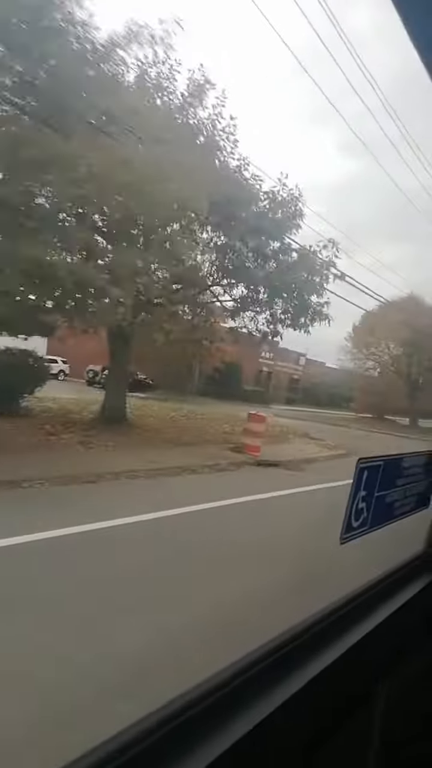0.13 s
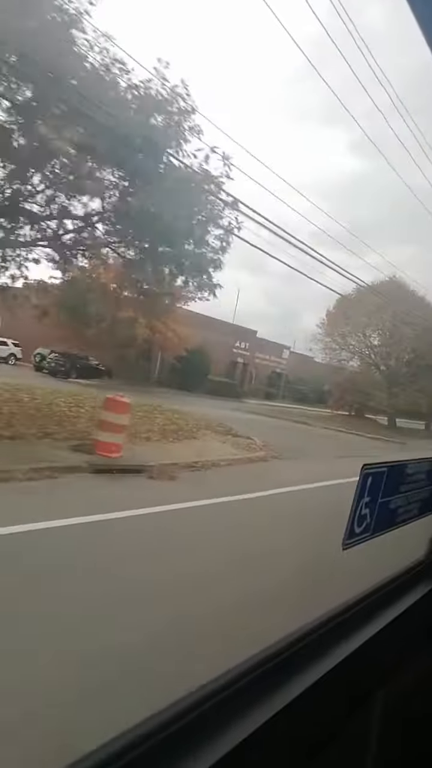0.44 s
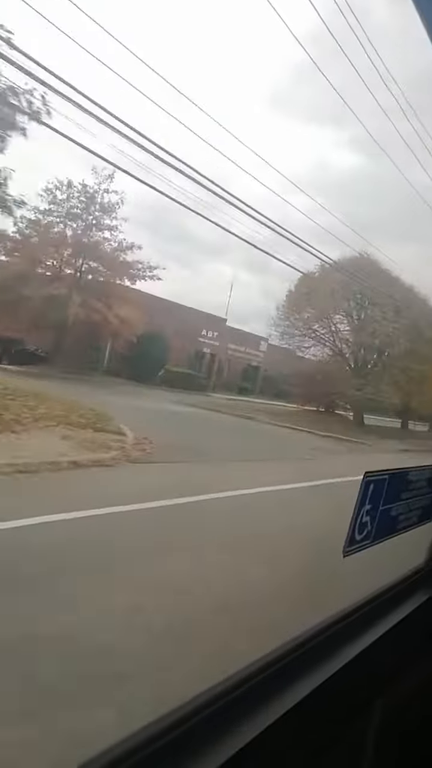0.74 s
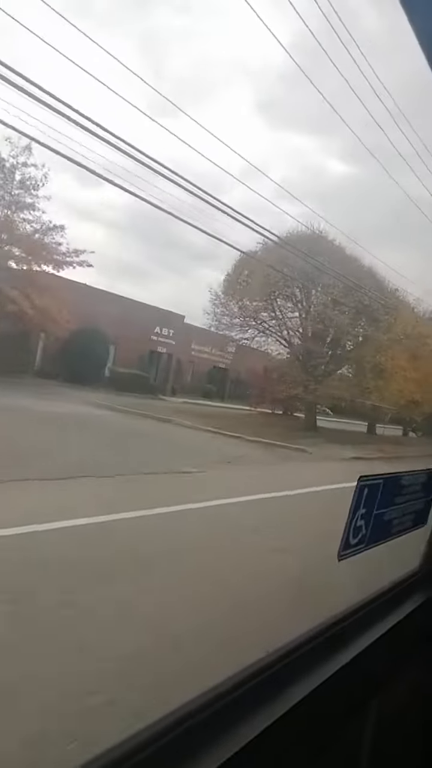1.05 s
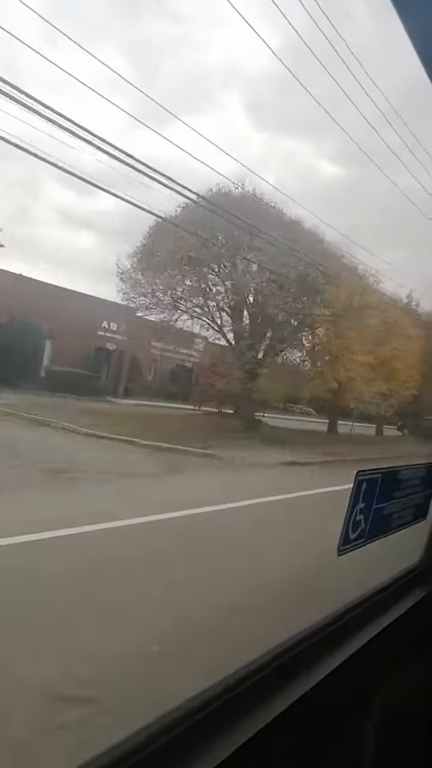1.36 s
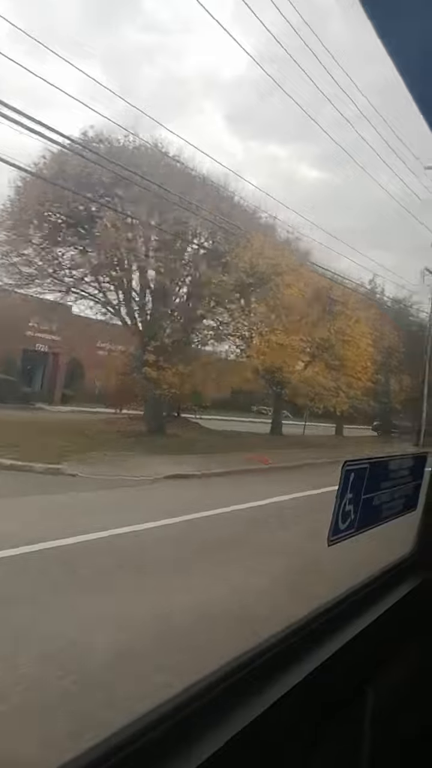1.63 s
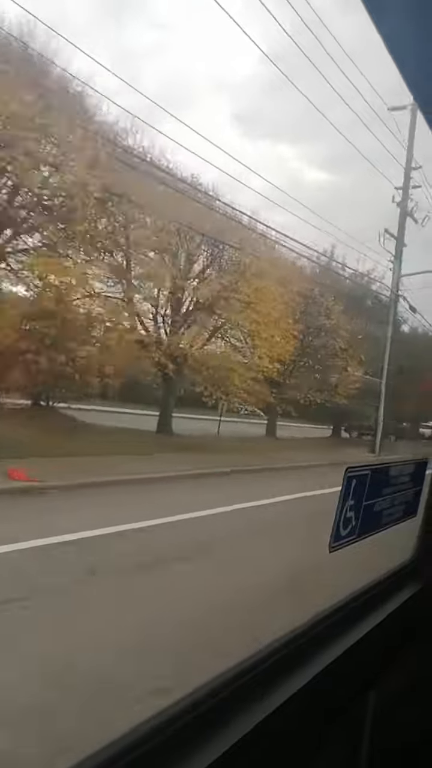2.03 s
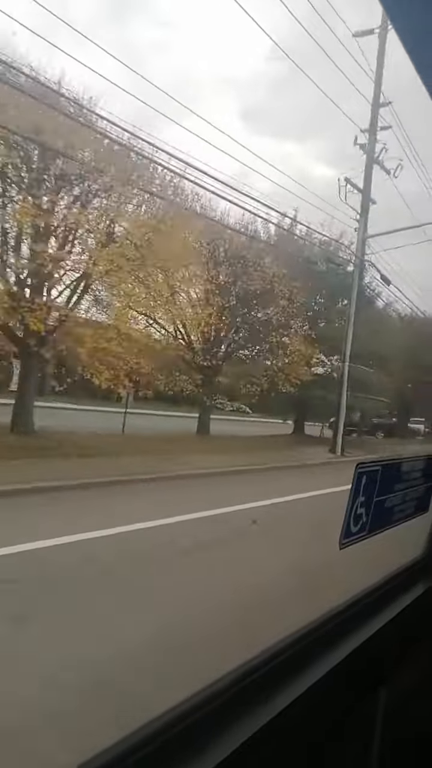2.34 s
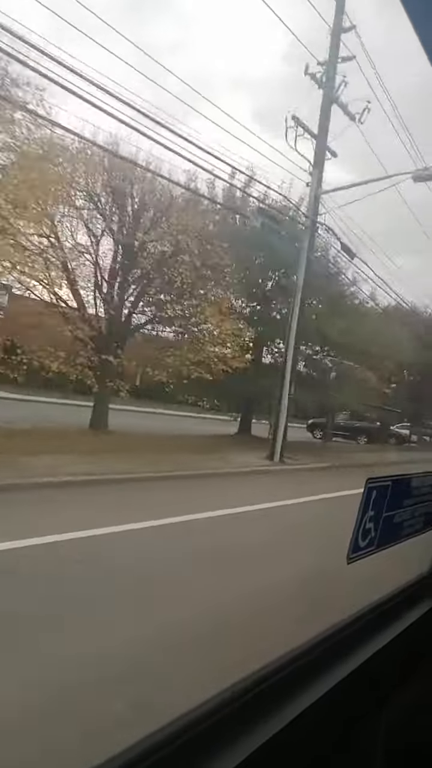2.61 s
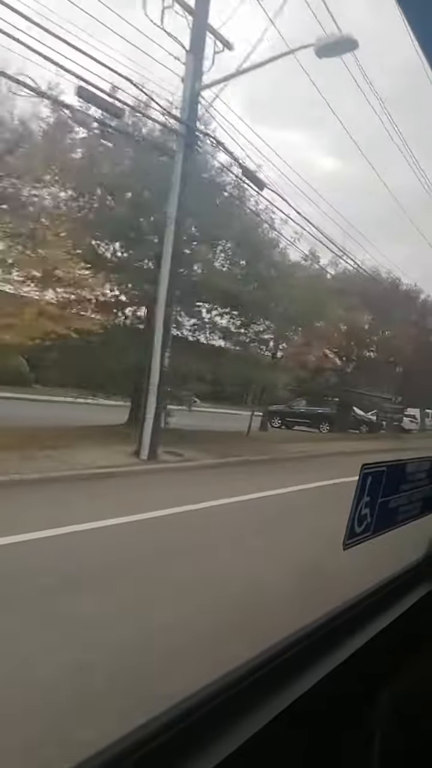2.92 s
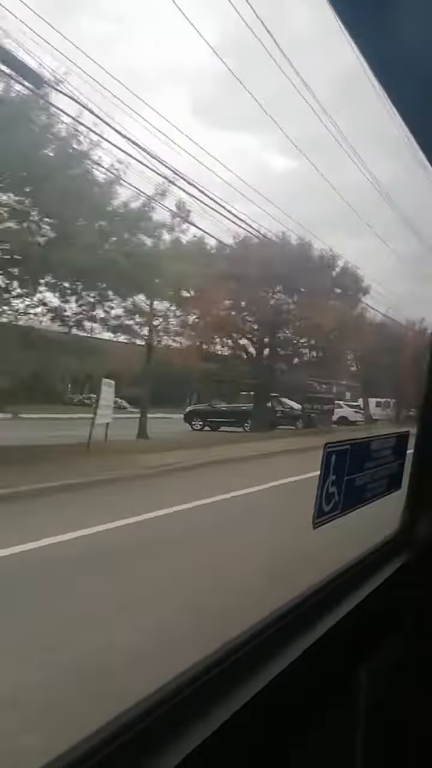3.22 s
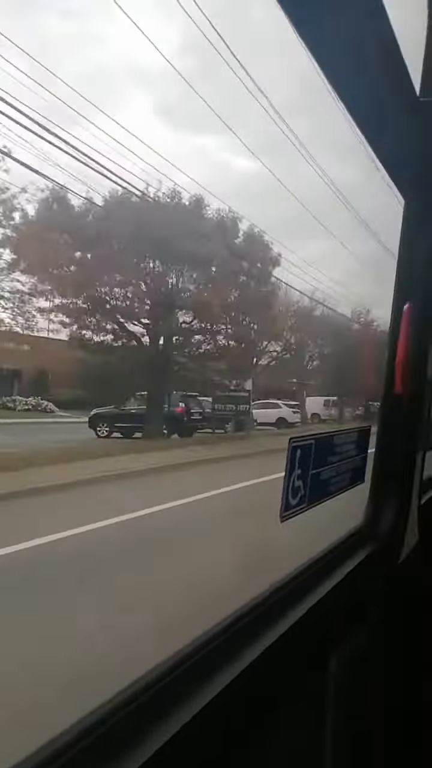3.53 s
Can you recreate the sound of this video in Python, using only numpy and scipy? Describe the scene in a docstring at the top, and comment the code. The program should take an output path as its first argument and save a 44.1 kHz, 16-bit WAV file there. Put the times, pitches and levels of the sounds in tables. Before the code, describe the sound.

Bus engine drone heard from a window seat, steady at first, then sinking into muffled road rumble and recovering a little; soft low bumps, a brief panel chirp early, light rattles, thin hiss, dull treble.

```python
"""An engine drones inside a moving city bus, heard by a side window: summed orders of a gliding revolution rate.
It eases off and sinks under shaped noise: cabin boom, panel rumble and tyre roar. Thin hums and whines run along.
Loose fittings sizzle in spells, as dense random contacts and thin rings, over a faint ventilation hiss.
A panel squeaks once as a rough harmonic chirp, the wheels take soft low bumps, and the trim creaks and ticks."""
import sys
import numpy as np
from scipy import signal
from scipy.fft import rfft, irfft
from scipy.io import wavfile
from scipy.ndimage import uniform_filter1d

SR = 44100
rng = np.random.default_rng(int(sys.argv[2]) if len(sys.argv) > 2 else 0)


def pcm_store(signal):
    """Save signal as 16-bit PCM."""
    levels = np.round(np.clip(np.atleast_2d(signal), -1, 1) * 32767)
    wavfile.write(sys.argv[1], SR, levels.astype(np.int16).T)


N = 161847
TIME = np.arange(N) / SR  # seconds
HZ = np.maximum(np.arange(N // 2 + 1) * SR / N, 1)  # spectrum bins, kept above zero for logarithms

# engine speed: (time [s], rate [revolutions per s])
ENGINE_SPEED = [(0, 37.6), (.3, 37.05), (.7, 36.75), (1.1, 36.6), (1.42, 36.65), (1.6, 36.05),
                (1.89, 35.15), (2.09, 34.15), (2.22, 33), (2.52, 31.1), (2.7, 28.9), (2.8, 28.3),
                (3.1, 30.5), (3.3, 32.8), (3.67, 32.5)]
# engine drone: (time [s], order 2 level [dB], order 3 level [dB], order 4 level [dB])
ENGINE_ORDERS = [(0, -38, -39, -19.5), (.35, -23, -27, -20), (.7, -23, -25, -17), (1.1, -24.5, -24.5, -20),
                 (1.38, -20, -33.5, -20), (1.6, -25, -27, -23.5), (1.87, -20, -22, -24),
                 (2.08, -22, -22.5, -27.5), (2.22, -39, -33.5, -30.5), (2.4, -26.5, -23.5, -23),
                 (2.55, -30.5, -26.5, -37), (2.7, -28.5, -19.5, -41), (2.82, -44, -48, -36.5),
                 (3.1, -38.5, -36, -43), (3.3, -40, -26, -24.5), (3.67, -40, -51, -32.5)]
# overtones of the drone: (multiple of the revolution rate, level against order 4 [dB])
ENGINE_OVERTONES = [(5, -21), (6, -23), (7, -31), (8, -22.5), (9, -26), (10, -33.5), (12, -31.5)]
# the orders waver and smear as the load comes off: (time [s], phase sway [rad])
ENGINE_WAVER = [(0, 0), (1.5, .03), (1.9, .25), (2.25, .5), (2.8, .7), (3.67, .7)]
# steady driveline hum: (time [s], pitch [Hz], level [dB])
DRIVELINE = [(0, 320, -40), (.45, 322.2, -39), (.9, 323.1, -40.5), (1.35, 318.5, -35.5), (1.65, 318.7, -45),
             (2.2, 315.2, -49.5), (3.67, 310, -48.5)]
# cabin boom under load: (time [s], level [dB])
BOOM_LEVEL = [(0, -18.5), (.4, -21), (.7, -25.5), (1.3, -22), (1.75, -22), (2.15, -21.5), (2.5, -27.5),
              (2.9, -23.5), (3.1, -28), (3.3, -25.5), (3.67, -26.5)]
# colour of the boom: (frequency [Hz], relative density [dB per Hz])
BOOM_SPECTRUM = [(15, -37), (25, -5.5), (45, -10), (58, -11), (82, -3.5), (100, -5), (132, -2.5), (165, -7),
                 (200, -21.5), (300, -32)]
# rumble of the panels: (time [s], level [dB])
PANEL_LEVEL = [(0, -26), (.2, -31.5), (.45, -24.5), (.9, -27), (1.3, -25.5), (1.6, -29), (2.0, -32.5),
               (2.45, -28.5), (2.8, -28.5), (3.15, -34), (3.5, -29.5), (3.67, -30.5)]
# colour of the panel rumble: (frequency [Hz], relative density [dB per Hz])
PANEL_SPECTRUM = [(130, -19), (165, -0.5), (200, 3.5), (240, -1.5), (280, -3.5), (320, -4), (365, -18),
                  (600, -37)]
# tyre roar before its treble is adjusted: (time [s], level [dB])
ROAD_LEVEL = [(0, -34), (.6, -34.5), (1.05, -34), (1.45, -33), (1.8, -32.5), (2.2, -33.5), (2.55, -34),
              (2.9, -32), (3.15, -32.5), (3.55, -32), (3.67, -31.5)]
# colour of the roar before its treble is adjusted: (frequency [Hz], relative density [dB per Hz])
ROAD_SPECTRUM = [(150, -5.5), (330, -5.5), (375, -1.5), (425, -1.5), (495, -0.5), (570, 1.5), (720, -1),
                 (900, -6), (1010, -7), (1130, -11.5), (1300, -14.5), (1650, -18), (1900, -23.5),
                 (2300, -23), (3000, -29), (4000, -33.5), (7000, -55.5)]
# brightness of the roar: (time [s], average treble gain [dB])
ROAD_BRIGHTNESS = [(0, 6), (.3, 1.5), (.7, -2), (1.4, 0.5), (1.85, -1), (2.55, 2.5), (2.9, 0.5), (3.2, 3),
                   (3.67, 1.5)]
# driveline and fan whines: (frequency [Hz], width [Hz], level [dB])
WHINES = [(620, 11, -48.5), (424.7, 9.9, -46), (1027, 50, -55.5), (1313, 18, -60.5), (1545, 4.4, -68)]
# colour of the ventilation hiss: (frequency [Hz], relative density [dB per Hz])
VENT_SPECTRUM = [(1000, 5), (2500, 7), (4000, -4), (5500, -2.5), (6300, -4.5), (7600, -17.5)]
# spells of sizzling fittings: (time [s], relative level [dB])
SIZZLE_LEVEL = [(0, -60), (.12, -57.5), (.3, -63), (.42, -65), (.5, -72), (.71, -69.5), (.8, -63),
                (.9, -63), (.96, -69), (1.1, -65.5), (1.14, -63), (1.23, -66), (1.4, -66.5), (1.52, -61.5),
                (1.68, -66.5), (1.74, -57), (1.81, -62.5), (1.88, -64.5), (1.94, -63), (2.2, -60),
                (2.47, -66.5), (2.58, -60.5), (2.68, -58.5), (2.77, -64.5), (2.86, -60), (3.04, -63.5),
                (3.1, -68), (3.2, -70), (3.28, -60), (3.46, -74), (3.55, -68), (3.64, -59.5)]
# colour of the sizzle: (frequency [Hz], relative density [dB per Hz])
SIZZLE_SPECTRUM = [(1200, -12.5), (2300, -0.5), (2900, 5.5), (3300, 2.5), (4700, 2.5), (5500, 3.5),
                   (5850, -1), (6250, -5.5), (6600, -1), (7100, 1), (7600, -11)]
# thin metallic rings in the sizzle: (frequency [Hz], width [Hz], relative level [dB])
SIZZLE_RINGS = [(3880, 74, -29.5), (4480, 43, -25), (5020, 35, -21), (6670, 27, -19.5), (7300, 22, -22.5)]
# course of the panel squeak: (time [s], average pitch [Hz], relative level [dB])
SQUEAK = [(.14, 900, -70), (.158, 1005, -33.5), (.18, 965, -33.5), (.198, 985, -41), (.215, 1075, -40),
          (.238, 1030, -47), (.26, 1000, -64)]
# harmonics of the squeak: (multiple of the pitch, relative level [dB])
SQUEAK_HARMONICS = [(1, 3), (2, -11.5), (3, -14.5), (4, -28)]
# bumps in the road: (time [s], peak level [dB])
BUMPS = [(0.168, -24), (1.663, -21), (2.619, -27), (3.13, -20)]
# small creaks of the trim: (centre time [s], half-length [s], relative level [dB])
CREAKS = [(.815, .025, -54), (1.15, .04, -56), (1.482, 0.033, -47.5)]
# rings of the creaking trim: (frequency [Hz], width [Hz], relative level [dB])
CREAK_RINGS = [(2240, 120, -3.5), (1160, 130, -2)]
# cabin resonances: (centre time [s], half-length [s], pitch [Hz], level at the centre [dB])
CABIN_SWELLS = [(1.82, .2, 83, -22.5), (2.48, .2, 166, -29), (3.45, .33, 128, -30)]
# the plastic trim snaps and rebounds: (time [s], starting level [dB])
TICKS = [(3.6021, -29.5), (3.6047, -36)]
# colour of the tick: (frequency [Hz], relative density [dB per Hz])
TICK_SPECTRUM = [(500, -6), (1500, 3.5), (2700, 7.5), (3800, -2), (5500, -3), (7600, -16)]

ENGINE_FLUTTER_DB, ENGINE_WANDER = .4, .0004  # wander is a fraction of the speed
WAVER_HZ = 9
DRIVELINE_UPPER_RATIO, DRIVELINE_UPPER_DB = 1.218, -5.5  # a weaker partial above the hum
ROAD_PATCHY_DB, ROAD_PATCH_HZ, ROAD_TREBLE_HZ = 2, 2.9, 1000
VENT_DB = -62
SIZZLE_DB, CONTACTS_PER_S, CONTACT_SPREAD_DB = 8, 7000, 1.1
SQUEAK_ROUGH, SQUEAK_CATCH_DB, SQUEAK_CATCH_HZ = .06, 3, 200  # roughness is a fraction of the pitch
BUMP_HZ, BUMP_RISE_S = 43.6, .056
TICK_DECAY_S = .0013
CUTOFF_HZ = 7620


def from_db(db):
    """Decibels to gain."""
    return 10 ** (np.asarray(db) / 20)


def rms_one(x):
    """Scale to unit rms."""
    return x / np.sqrt(np.mean(x ** 2) + 1e-20)


def in_time(rows):
    """Each column of a curve, sample by sample."""
    s, *columns = np.transpose(rows)
    return [np.interp(TIME, s, column) for column in columns]


def white():
    """Fresh white noise."""
    return rng.standard_normal(N)


def drift(rate_hz):
    """Random sway of unit rms, weakening above rate_hz."""
    return rms_one(irfft(rfft(white()) / (1 + (HZ / rate_hz) ** 2), N))


def running_phase(hz):
    """Phase of a gliding pitch."""
    return 2 * np.pi * np.cumsum(hz) / SR


def coloured(x, spectrum):
    """Give x a spectrum that falls away beyond both ends; unit rms."""
    hz, db = np.transpose(spectrum)
    below = np.minimum(HZ / hz[0], 1) ** 2
    above = np.minimum(hz[-1] / HZ, 1) ** 2
    gain = from_db(np.interp(np.log(HZ), np.log(hz), db))
    return rms_one(irfft(rfft(x) * below * above * gain, N))


def resonances(x, rows):
    """Narrow resonances driven by x, each at its own level."""
    drive = rfft(x)
    out = 0
    for hz, width, db in rows:
        response = 1 / (1 + ((HZ - hz) / width) ** 2) ** 2
        out = out + from_db(db) * rms_one(irfft(drive * response, N))
    return out


def steadied(x, share):
    """Even out the slow swells of a noise."""
    power = uniform_filter1d(x ** 2, size=SR // 8, mode="reflect")
    return rms_one(x / (power + 1e-9) ** (share / 2))


def patchy(x, depth_db, rate_hz, count):
    """Narrow bands of x swell and fade, each in its own way."""
    place = np.interp(np.log(HZ), np.log([200, 2000]), [0, count - 1])
    spectrum = rfft(x)
    out = 0
    for k in range(count):
        overlap = np.maximum(1 - np.abs(place - k), 0)
        out = out + irfft(spectrum * overlap, N) * from_db(depth_db * drift(rate_hz))
    return rms_one(out)


def engine():
    """Orders of the revolution rate: in step under load, wavering apart as the load comes off."""
    speed, = in_time(ENGINE_SPEED)
    waver, = in_time(ENGINE_WAVER)
    second_db, third_db, fourth_db = in_time(ENGINE_ORDERS)
    turn = running_phase(speed * (1 + ENGINE_WANDER * drift(5.8)))
    orders = [(2, second_db), (3, third_db), (4, fourth_db)]
    orders += [(k, fourth_db + db) for k, db in ENGINE_OVERTONES]
    drone = sum(from_db(db) * np.cos(k * turn + waver * drift(WAVER_HZ)) for k, db in orders)
    return -np.sqrt(2) * from_db(ENGINE_FLUTTER_DB * drift(11)) * drone


def driveline():
    """A thin two-partial hum that nearly holds its pitch and fades when the load comes off."""
    hz, level_db = in_time(DRIVELINE)
    phase = running_phase(hz * (1 + .004 * drift(8)))
    upper = from_db(DRIVELINE_UPPER_DB) * np.sin(DRIVELINE_UPPER_RATIO * phase)
    return np.sqrt(2) * from_db(level_db) * (np.sin(phase) + upper)


def boom():
    """The cabin booms with the load: low noise, partly steadied."""
    level_db, = in_time(BOOM_LEVEL)
    return from_db(level_db) * steadied(coloured(white(), BOOM_SPECTRUM), share=.57)


def panels():
    """Wall and floor panels rumble above the boom: partly steadied noise."""
    level_db, = in_time(PANEL_LEVEL)
    return from_db(level_db) * steadied(coloured(white(), PANEL_SPECTRUM), share=.32)


def road():
    """Tyre roar in wandering patches of pitch; its treble follows the road surface."""
    level_db, = in_time(ROAD_LEVEL)
    treble_db, = in_time(ROAD_BRIGHTNESS)
    patches = patchy(coloured(white(), ROAD_SPECTRUM), ROAD_PATCHY_DB, ROAD_PATCH_HZ, count=26)
    roar = steadied(patches, share=.36)
    treble = irfft(rfft(roar) / (1 + (ROAD_TREBLE_HZ / HZ) ** 6), N)
    brightness = from_db(treble_db + .31 * drift(6))
    return from_db(level_db) * (roar - treble + treble * brightness)


def whines():
    """Driveline and fan whines: noise through narrow resonances."""
    return resonances(white(), WHINES)


def ventilation():
    """Faint, steady air hiss: coloured noise."""
    return from_db(VENT_DB) * coloured(white(), VENT_SPECTRUM)


def fittings():
    """Dense tiny contacts of loose fittings, with a few thin metallic rings."""
    level_db, = in_time(SIZZLE_LEVEL)
    sizes = from_db(CONTACT_SPREAD_DB * np.minimum(rng.exponential(1, N), 4)) * rng.choice([-1, 1], N)
    struck = rng.random(N) < CONTACTS_PER_S / SR
    contacts = rms_one(sizes * struck) + .57 * white()  # noise fills the gaps
    rings = from_db(3.2 * drift(6)) * resonances(contacts, SIZZLE_RINGS)
    spells = from_db(SIZZLE_DB + level_db + 1.5 * drift(18))
    return spells * (coloured(contacts, SIZZLE_SPECTRUM) + rings)


def squeak():
    """A panel rubs in a short stick-slip chirp: harmonics roughened in pitch and level."""
    hz, level_db = in_time(SQUEAK)
    phase = running_phase(hz * (1 + SQUEAK_ROUGH * drift(SQUEAK_CATCH_HZ)))
    tone = 0
    for k, db in SQUEAK_HARMONICS:
        tone = tone + from_db(db + SQUEAK_CATCH_DB * drift(SQUEAK_CATCH_HZ)) * np.sin(k * phase)
    sounding = (TIME > SQUEAK[0][0]) * (TIME < SQUEAK[-1][0])
    return from_db(level_db) * tone * sounding


def bumps():
    """The body rocks briefly on each bump: a low sine that swells and dies away."""
    out = np.zeros(N)
    for s, db in BUMPS:
        age = np.maximum(TIME - s, 0)
        swell = (age / BUMP_RISE_S) ** 2 * np.exp(2 * (1 - age / BUMP_RISE_S))
        out += from_db(db) * swell * np.sin(2 * np.pi * BUMP_HZ * age)
    return out


def creaks():
    """The trim rubs faintly: short swells of resonant noise."""
    swells = sum(from_db(db) * np.exp(-2 * ((TIME - s) / length) ** 2) for s, length, db in CREAKS)
    return swells * resonances(white(), CREAK_RINGS)


def cabin_resonances():
    """Low cabin tones swell one after another and beat against the drone."""
    out = 0
    for s, length, hz, db in CABIN_SWELLS:
        swell = from_db(db) * np.exp(-2 * ((TIME - s) / length) ** 2)
        out = out + swell * np.sin(2 * np.pi * hz * TIME + .5 * drift(8.2))
    return np.sqrt(2) * out


def tick():
    """One sharp, dry snap of plastic trim with a tiny rebound: decaying noise."""
    strikes = sum(from_db(db) * (TIME > s) * np.exp(-np.abs(TIME - s) / TICK_DECAY_S) for s, db in TICKS)
    return strikes * coloured(white(), TICK_SPECTRUM)


def scene():
    """Everything as heard from a window seat."""
    drive = engine() + driveline() + whines()
    ride = boom() + panels() + road() + bumps() + cabin_resonances()
    interior = ventilation() + fittings() + squeak() + creaks() + tick()
    return (drive + ride + interior)[None]


def record(dry):
    """The top is cut steeply by a low-pass filter."""
    lowpass = signal.ellip(12, .2, 80, CUTOFF_HZ, fs=SR, output="sos")  # order, ripple dB, rejection dB
    return signal.sosfilt(lowpass, dry)


dry = scene()
out = record(dry)
pcm_store(out)
```